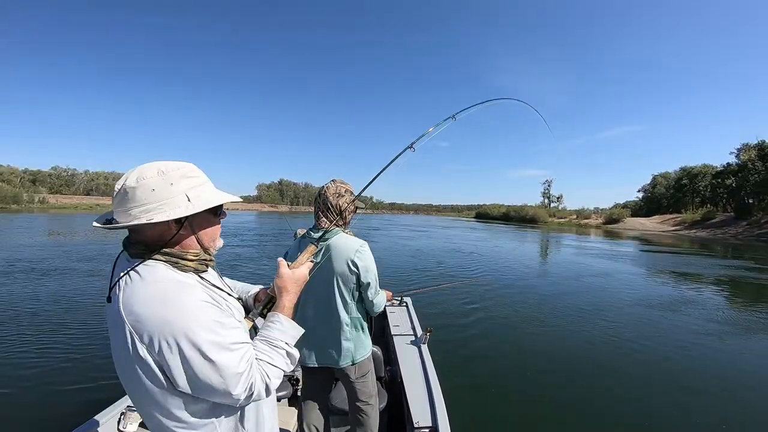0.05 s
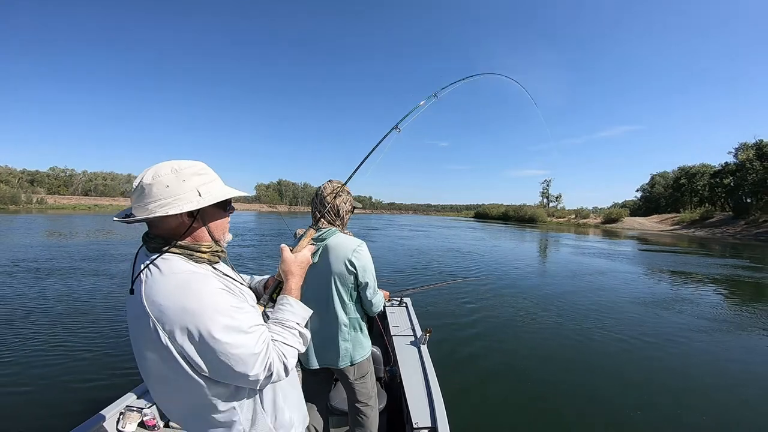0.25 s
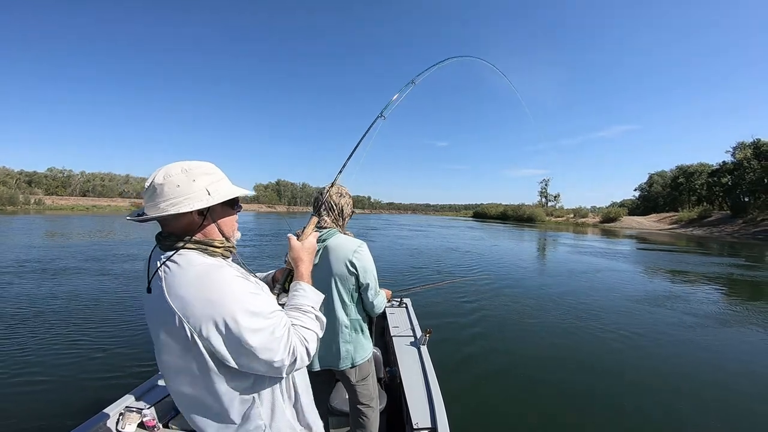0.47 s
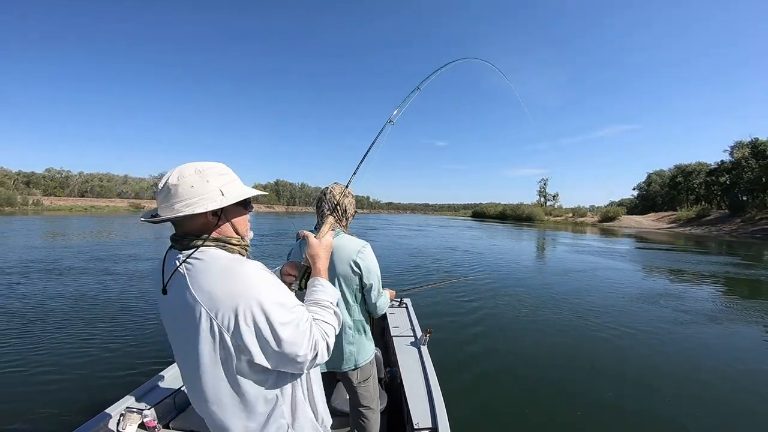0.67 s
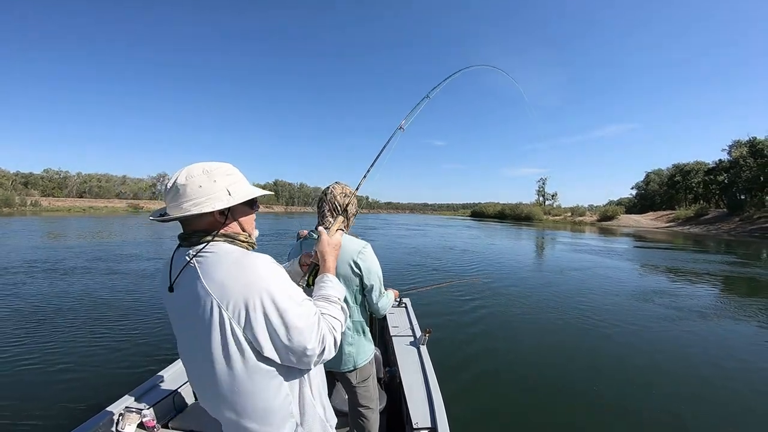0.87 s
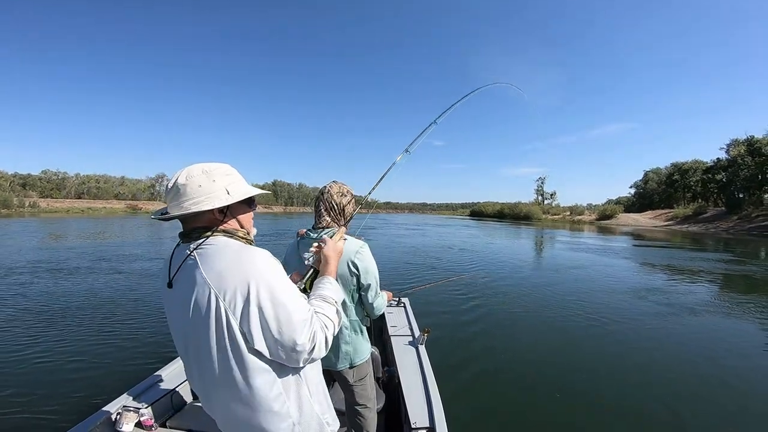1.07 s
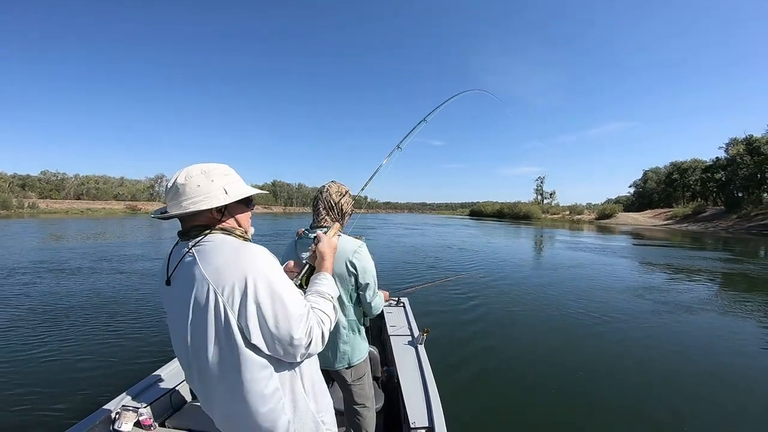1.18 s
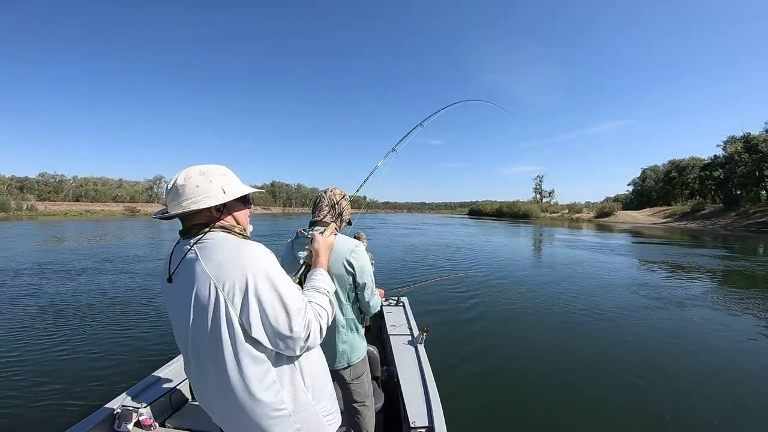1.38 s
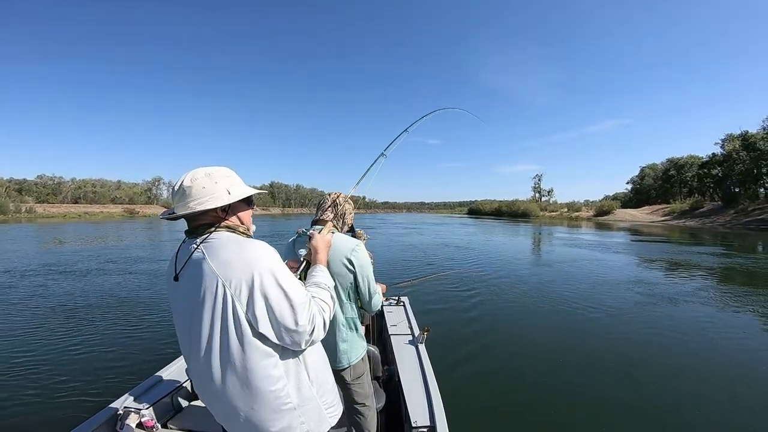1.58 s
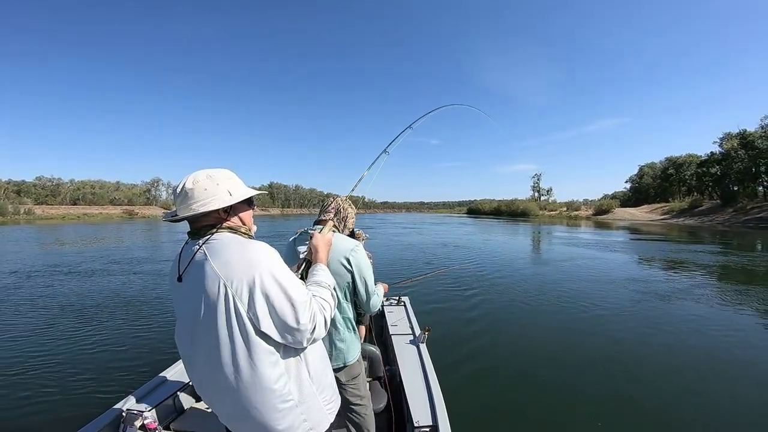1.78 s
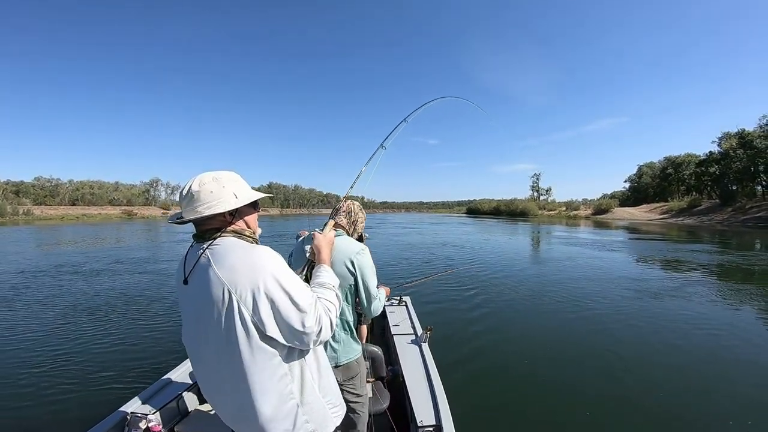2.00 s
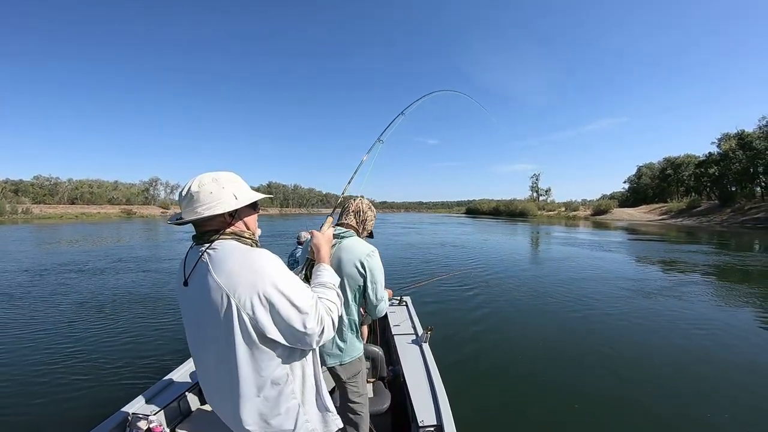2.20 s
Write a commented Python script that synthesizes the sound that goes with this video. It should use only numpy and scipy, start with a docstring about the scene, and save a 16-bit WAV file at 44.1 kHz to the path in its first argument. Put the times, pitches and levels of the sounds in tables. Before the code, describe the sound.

Wind thumps on the microphone aboard a small river boat, then a fishing reel ticks in a bright, irregular ratcheting run. The clicks stop, and a soft slap and gulp of water sound against the hull.

```python
"""Wavelets slap the hollow hull of a small boat drifting on a river, and eddies of wind begin to
buffet the two microphone ports. From 0.4 s a hooked fish pulls line off the reel: the drag's pawl
clicks unevenly, each impact ringing the reel, while the line hisses through the guides. From 1.1 s
pockets of air gulp under the hull. The clicks end at 1.8 s; the strongest slap and a low gulp
follow, over the continuing breeze and the faint wash of the river."""
import sys
import numpy as np
from scipy import signal
from scipy.fft import rfft, irfft
from scipy.io import wavfile
from scipy.ndimage import uniform_filter1d

SR = 44100
rng = np.random.default_rng(int(sys.argv[2]) if len(sys.argv) > 2 else 0)


def store_pcm(level_fs):
    """Save levels as 16-bit WAV."""
    pcm = np.round(np.clip(level_fs, -1, 1) * 32767).astype(np.int16)
    wavfile.write(sys.argv[1], SR, np.atleast_2d(pcm).T)


N = 99225
T = np.arange(N) / SR

# The pawl drops off a tooth (the 1.2050 s row is the pawl's first touch before its drop at 1.2112 s): start_s,
# level_db, pitch_hz, treble_top_hz
PAWL_DROPS = [(0.4225, -48.5, 2900, 9000), (.4400, -39, 6300, 13300), (.6200, -32, 6240, 11900),
              (0.6853, -33.5, 6400, 10700), (0.7744, -29.5, 7000, 7400), (.8307, -33.5, 7200, 13100),
              (.8698, -32, 7560, 12300), (0.9368, -35, 6900, 10000), (0.9941, -35, 6000, 14300),
              (1.0304, -29, 6460, 10200), (1.0799, -28, 6200, 11800), (1.1660, -33, 6000, 9700),
              (1.2050, -32, 4400, 9800), (1.2112, -30, 7500, 8800), (1.244, -34, 7400, 12800),
              (1.2877, -34, 7200, 13300), (1.3260, -32.5, 6300, 11000), (1.3610, -35, 5830, 12000),
              (1.417, -32.5, 5650, 10500), (1.4836, -31, 6400, 11400), (1.5225, -39.5, 5970, 9500),
              (1.5536, -32, 5950, 12700), (1.6105, -30, 7400, 7500), (1.68, -38.5, 6500, 11600),
              (1.7397, -35, 6670, 11100), (1.8134, -35.5, 6340, 7940)]
# Natural modes of the reel: pitch_hz, gain_db, t60_s
REEL_RESONANCES = [(1750, -27.5, 0.01), (2348, -18, 0.012), (2774, -17.5, 0.012), (3335, -18.5, 0.0079),
                   (4260, -16.5, 0.0084), (5180, -34, .04), (6330, -17, 0.022), (6520, -23.5, 0.03),
                   (8450, -19.5, 0.015)]
# Envelope of the running line's hiss: time_s, level_db
LINE_ENVELOPE = [(.4, -78), (.7, -68), (1.05, -62.5), (1.49, -68.5), (1.54, -58), (1.6, -67.5), (2, -79.5)]
# Spectral shape of that hiss: frequency_hz, density_db
LINE_SPECTRUM = [(1000, -10), (2800, -7.5), (7500, -17.5), (15000, -28.5)]
# Envelope of the breeze at each port: time_s, left_db, right_db
BREEZE_ENVELOPE = [(0, -45.5, -36.5), (.135, -46, -48), (.23, -54, -22.5), (.47, -24.5, -25.5),
                   (.62, -35.5, -27), (.8, -45, -38), (1.08, -25.5, -19), (1.34, -39.5, -32),
                   (1.48, -29.5, -26), (1.6, -27.5, -28), (1.68, -49.5, -40), (1.88, -31.5, -28),
                   (1.98, -33.5, -27.5), (2.15, -41, -41.5), (2.25, -39.5, -34.5)]
# Spectral shape of the breeze: frequency_hz, density_db
BREEZE_SPECTRUM = [(18, -2), (50, 7), (90, 1.5), (170, -4), (250, -19.5), (400, -35), (1000, -50.5),
                   (4000, -80.5)]
# An eddy hits a port: peak_s, level_db, rumble_top_hz, left_minus_right_db
EDDIES = [(0.214, -19.5, 173, -17.5), (.264, -16.5, 175, -3.5), (0.297, -15, 194, -2),
          (0.318, -9, 268.5, -11), (0.336, -15.5, 277, -28), (0.373, -12, 181, 14),
          (0.877, -16.5, 104.4, -21), (0.945, -13.5, 161, -17), (1.01, -15.5, 190, -7),
          (1.043, -18.5, 208, -17), (1.117, -14, 184, -6), (1.261, -11, 154.5, -38), (1.297, -17, 108, -15),
          (1.391, -19, 191, -19), (1.474, -17, 97, -12), (1.538, -13, 170, -16.5), (1.558, -12, 139, -16),
          (1.723, -24.5, 123, -19)]
# A wavelet slaps the hull: start_s, level_db, decay_s, relative_spray_db
WAVELETS = [(.005, -43.5, 0.053, -17), (0.042, -42.5, 0.011, -11.5), (0.106, -45.5, 0.047, -21.5),
            (0.462, -47.5, 0.038, -15.5), (0.54, -44, 0.044, -20), (1.357, -48.5, 0.048, -15.5),
            (1.837, -36, 0.036, -20), (1.917, -49.5, 0.023, -10.5), (1.997, -47.5, 0.032, -33)]
# Natural modes of the hull: pitch_hz, gain_db
HULL_RESONANCES = [(395, -1), (590, 1.5), (850, 2), (1210, -15)]
# Spectral shape of a wavelet's splash: frequency_hz, density_db
SPLASH_SPECTRUM = [(220, -4), (380, 4.5), (1250, -3), (3200, -22.5), (12000, -66)]
# Spectral shape of its spray: frequency_hz, density_db
SPRAY_SPECTRUM = [(1000, -4), (2800, 9), (4500, -2), (6300, 2.5), (9000, -8.5), (15000, -28)]
# An air pocket rings under the hull: start_s, level_db, pitch_hz, decay_s
AIR_POCKETS = [(1.098, -46.5, 605, 0.026), (1.134, -40, 571, 0.03), (1.372, -53.5, 846, 0.029),
               (1.404, -47, 568, 0.031), (1.859, -37, 263, 0.032)]
# Spectral shape of the river: frequency_hz, density_db
RIVER_SPECTRUM = [(300, -13.5), (480, -1), (870, 1), (1100, -9.5), (2400, -14), (4200, -18), (6300, -17.5),
                  (13000, -32), (16000, -69.5)]
# Likeness of the surrounding sound at the two ports: frequency_hz, correlation
PORT_CORRELATION = [(150, -0.68), (400, 0.047), (950, -0.86), (2400, 0.13), (6000, 0.36), (15000, -0.13)]


def pawl_click(t, db, pitch_hz, top_hz):
    """Impact excitation: a pawl scrapes up a tooth, touches, then drops at t = 0, ringing the reel."""
    scrape_db, scrape_s, touch_db = -39, 0.018, -13
    chatter_db, chatter_s, contact_q, low_hz = -5.5, 0.00074, 4.3, 1980
    snap_db, snap_low_hz, mode_spread_db = 8, 10500, 1.5
    contact = from_db(scrape_db) * np.exp(-np.abs(t) / scrape_s) * (t < 0)
    blows = np.zeros(len(t))
    touch_lead_s = 0.003 * 2 ** rng.uniform(-0.63, 1)
    for blow_s, blow_db in ((-touch_lead_s, touch_db), (0, 0)):
        pulse = np.exp(-((t - blow_s) / chatter_s) ** 2) * (t >= blow_s - chatter_s)
        contact += from_db(blow_db + chatter_db) * pulse
        blows[np.searchsorted(t, blow_s)] += from_db(blow_db)
    grit = resonate(rng.standard_normal(len(t)), pitch_hz, pitch_hz / contact_q)
    chatter = contact * evened(butter(grit, low_hz, "high"), 2 * chatter_s)
    snap = from_db(snap_db) * butter(blows, snap_low_hz, "high")   # the bare metal edge striking
    modes = sum((-1) ** k * from_db(mode_db + mode_spread_db * rng.normal()) * ring(blows, hz, t60_s)
                for k, (hz, mode_db, t60_s) in enumerate(REEL_RESONANCES))
    click = snap + chatter + butter(modes, low_hz, "high")
    return from_db(db) * butter(click, top_hz, "low", order=3)


def reel_drag(size=4096):
    """Direct and scattered sound: each click is followed by reflections off the anglers and boat."""
    scatter_db, scatter_s, scatter_pan_db, scatter_top_hz = -7.5, 0.0058, -15, 10000
    out, t = np.zeros((2, N + size)), np.arange(size) / SR
    for start_s, db, pitch_hz, top_hz in PAWL_DROPS:
        click = pawl_click(t - t[size // 2], db, pitch_hz, top_hz)
        direct = np.array([click, np.roll(click, 1)])   # reaches the left port a sample early
        echoes = rng.standard_normal((2, size)) * np.exp(-t / scatter_s) * np.sqrt(2 / (scatter_s * SR))
        dulled = butter(click, scatter_top_hz, "low")
        scattered = signal.fftconvolve(dulled[None], echoes, axes=-1)[:, :size]
        i = int(start_s * SR) - size // 2
        out[:, i:i + size] += direct + from_db(scatter_db) * pan(scatter_pan_db) * scattered
    return out[:, :N]


def line_hiss():
    """Sliding friction: line running through the guides makes a grainy broadband noise."""
    grain = flicker(depth_db=3, rate_hz=48.5)
    return from_db(in_time(LINE_ENVELOPE)) * grain * diffuse_noise(LINE_SPECTRUM)


def wind():
    """Turbulent pressure: a breeze flutters on both ports; each eddy thumps one more than the other."""
    sigma_s, low_share, roll_off_db_per_octave = 0.01, 0.08, 31
    rasp_db, rasp_top_hz = -36.5, 591
    hz = np.fft.rfftfreq(N, 1 / SR) + 1e-6
    breeze = from_db(in_time(BREEZE_ENVELOPE)) * flicker(depth_db=1.5, rate_hz=30.4)
    out = breeze * turbulence(from_db(at_hz(BREEZE_SPECTRUM, hz)), even_s=0.071)
    for peak_s, db, top_hz, side_db in EDDIES:
        low_pass = 1 / np.hypot(1, from_db(roll_off_db_per_octave * np.log2(hz / top_hz)))
        high_pass = 1 / np.hypot(1, (low_share * top_hz / hz) ** 2)
        rasp = from_db(rasp_db) / (1 + (hz / rasp_top_hz) ** 4)
        rumble = turbulence(low_pass * high_pass + rasp, even_s=0.038)
        envelope = from_db(db) * np.exp(-((T - peak_s) / sigma_s) ** 2 / 2)
        ports = pan(side_db)
        out += ports / ports.max() * envelope * rumble
    return out


def hull_slaps(attack_s=0.0044, splash_db=-5, hull_q=10.1):
    """Forced vibration: a wavelet's dull splash drives the hull's modes, with a little bright spray."""
    splash_power = spray_power = 0
    for start_s, db, decay_s, spray_db in WAVELETS:
        envelope = from_db(db) * swell(start_s, attack_s, decay_s)
        splash_power += envelope ** 2   # incoherent sounds add in power
        spray_power += (from_db(spray_db) * envelope) ** 2
    splash = np.sqrt(splash_power) * diffuse_noise(SPLASH_SPECTRUM)
    spray = np.sqrt(spray_power) * diffuse_noise(SPRAY_SPECTRUM)
    hull = sum(from_db(db) * resonate(splash, hz, hz / hull_q) for hz, db in HULL_RESONANCES)
    return from_db(splash_db) * splash + hull + spray


def air_gulps(width_hz=44, attack_s=0.0085):
    """Cavity resonance: air trapped under the hull rings briefly with a hollow note."""
    out = 0
    for start_s, db, hz, decay_s in AIR_POCKETS:
        band = resonate(rng.standard_normal((2, N)), hz, width_hz)
        note = evened(resonate(band, hz, 2 * width_hz), decay_s)
        out += from_db(db) * swell(start_s, attack_s, decay_s) * note
    return out


def river_wash(level_db=-66, low_hz=314):
    """Stationary noise: flowing water makes a faint, even wash all around."""
    return from_db(level_db) * rms_one(butter(diffuse_noise(RIVER_SPECTRUM), low_hz, "high"))


def turbulence(gain, even_s):
    """Incoherent pressure: noise shaped by a spectral gain, independent at each port; rms 1."""
    return evened(irfft(gain * rfft(rng.standard_normal((2, N))), N), even_s)


def diffuse_noise(spectrum):
    """Partial coherence: noise from all around, its left-right likeness set by frequency; rms 1."""
    hz = np.fft.rfftfreq(N, 1 / SR)
    mid, side = rfft(rng.standard_normal((2, N)))
    correlation = np.clip(at_hz(PORT_CORRELATION, hz), -1, 1)
    ports = np.sqrt(1 + correlation) * mid + np.sqrt(1 - correlation) * side * [[1], [-1]]
    return rms_one(irfft(from_db(at_hz(spectrum, hz)) * ports, N))


def flicker(depth_db, rate_hz):
    """Random amplitude modulation: a wavering gain of rms 1."""
    drift = butter(rng.standard_normal(N + SR), rate_hz, "low")[SR:]
    return rms_one(from_db(depth_db * rms_one(drift)))


def evened(x, span_s):
    """Envelope normalisation: dividing by the running rms removes slow swings of level."""
    span = max(int(span_s * SR), 2)
    power = uniform_filter1d(uniform_filter1d(x ** 2, span), span)
    return x / np.sqrt(np.abs(power) + 1e-20)


def swell(start_s, attack_s, decay_s):
    """Exponential decay after a linear rise."""
    rise = np.clip((T - start_s) / attack_s, 0, 1)
    return rise * np.exp(-np.maximum(T - start_s - attack_s, 0) / decay_s)


def ring(x, hz, t60_s):
    """Damped oscillator: a unit impulse starts a decaying sine of height 1."""
    r, w = np.exp(-np.log(1000) / (t60_s * SR)), 2 * np.pi * hz / SR
    return signal.lfilter([0, np.sin(w)], [1, -2 * r * np.cos(w), r * r], x + 1e-18)


def resonate(x, hz, width_hz):
    """Band-pass resonance with a peak gain of 1."""
    r, w = np.exp(-np.pi * width_hz / SR), 2 * np.pi * hz / SR
    return signal.lfilter(np.array([1, 0, -1]) * (1 - r * r) / 2, [1, -2 * r * np.cos(w), r * r], x)


def butter(x, hz, kind, order=2):
    """Maximally flat filter."""
    sections = signal.butter(order, np.clip(hz, 10, SR / 2 - 100), kind, fs=SR, output="sos")
    return signal.sosfilt(sections, x + 1e-18)


def in_time(rows):
    """Linear interpolation of a curve's columns at every sample."""
    time_s, *columns = np.transpose(rows)
    return np.array([np.interp(T, time_s, column) for column in columns])


def at_hz(points, hz):
    """Interpolation on a log-frequency axis."""
    points_hz, values = np.transpose(points)
    return np.interp(np.log(hz + 1e-9), np.log(points_hz), values)


def pan(db):
    """Level difference, left minus right, as a pair of gains."""
    return from_db(np.array([[db], [-db]]) / 2)


def from_db(db):
    """Amplitude ratio from decibels."""
    return 10 ** (np.asarray(db) / 20)


def rms_one(x):
    """Normalisation to unit rms."""
    return x / np.sqrt(np.mean(x ** 2) + 1e-20)


def scene(water_pan_db=-2.5):
    """Superposition: tackle, water and wind add at the two ports."""
    river = river_wash()
    tackle = reel_drag() + line_hiss()
    water = hull_slaps() + air_gulps() + river
    return tackle + pan(water_pan_db) * water + wind()


def record(dry, cutoff_hz=16000):
    """Band limiting: an elliptic low-pass cuts the top steeply."""
    return signal.sosfilt(signal.ellip(10, .1, 80, cutoff_hz, fs=SR, output="sos"), dry)


dry = scene()
out = record(dry)
store_pcm(out)
```